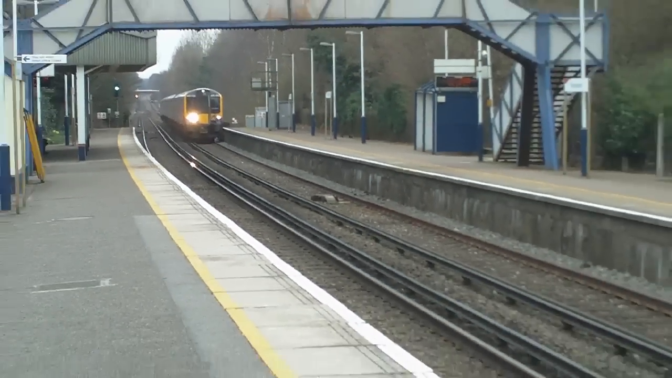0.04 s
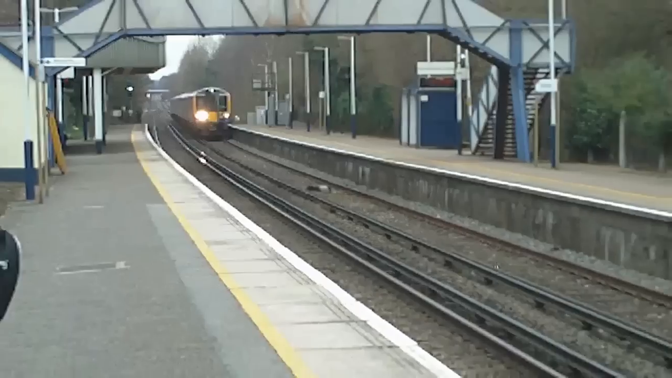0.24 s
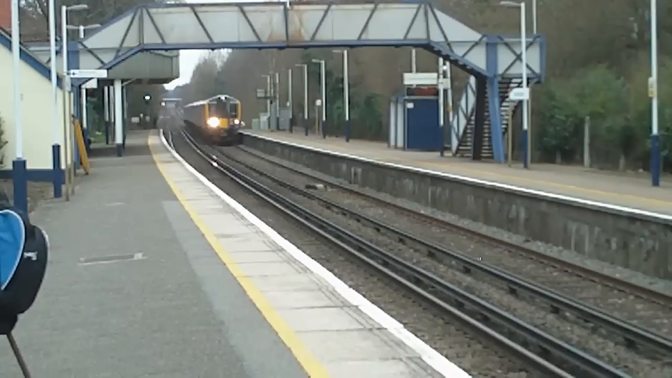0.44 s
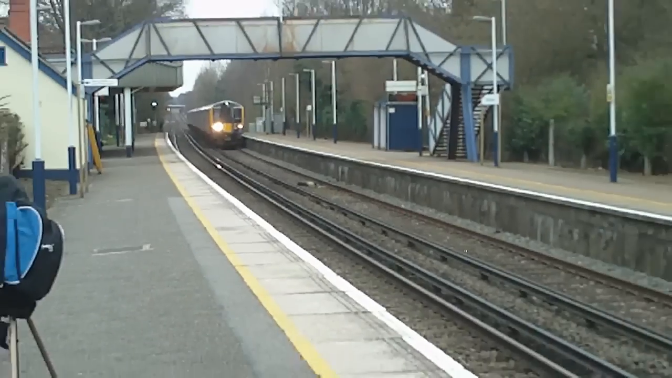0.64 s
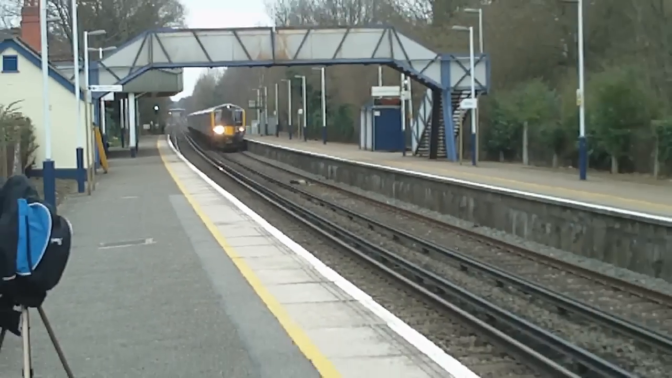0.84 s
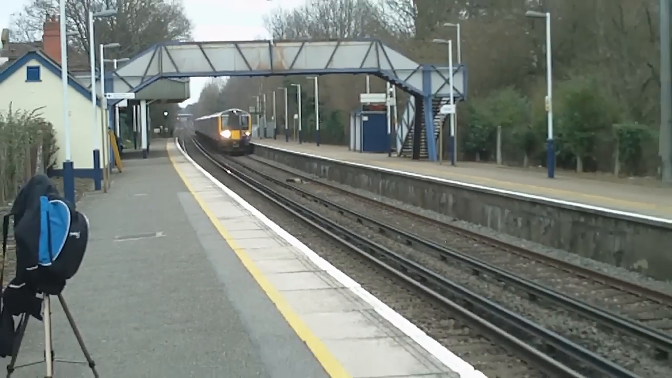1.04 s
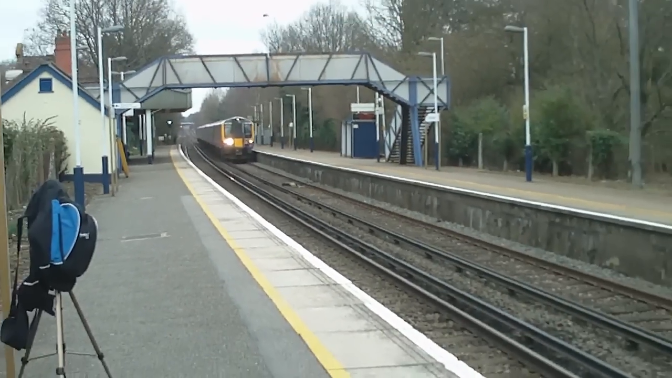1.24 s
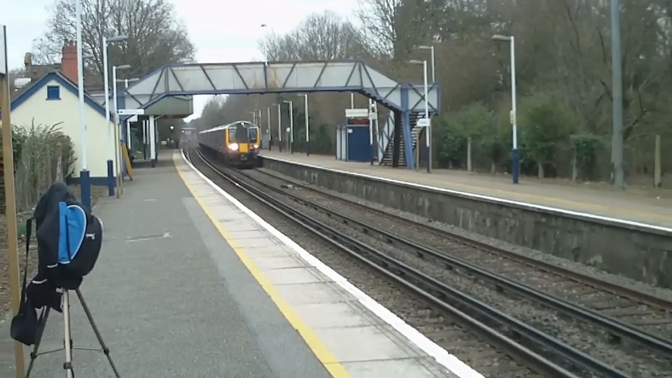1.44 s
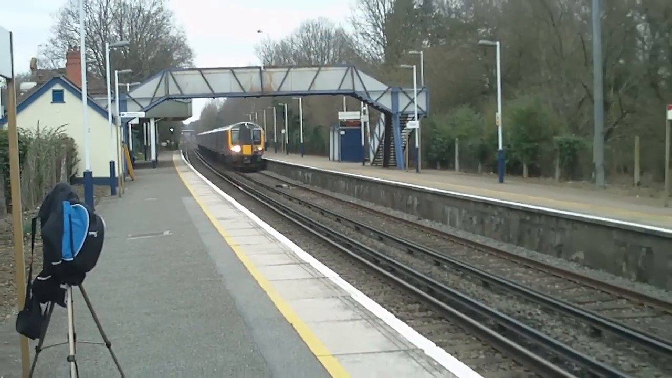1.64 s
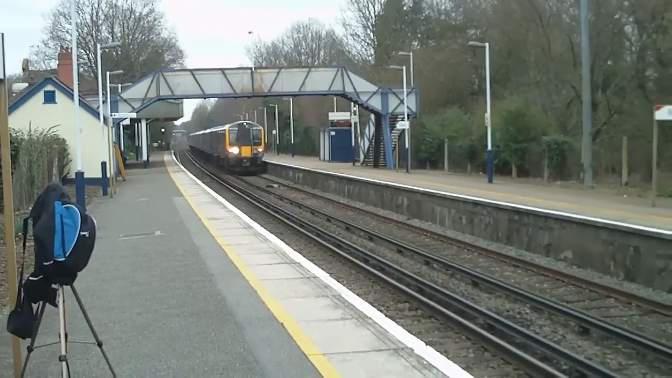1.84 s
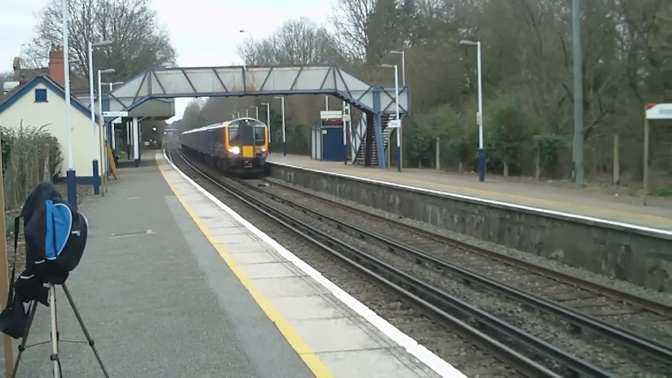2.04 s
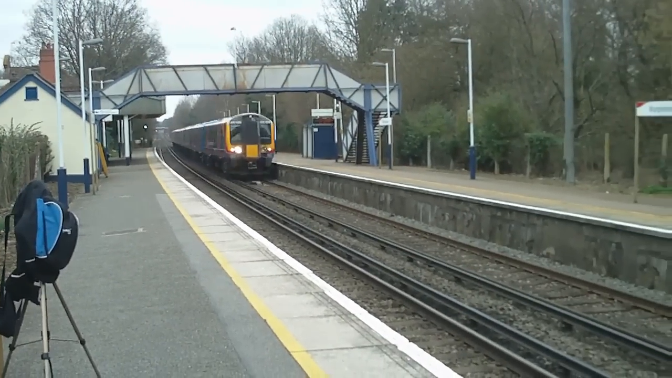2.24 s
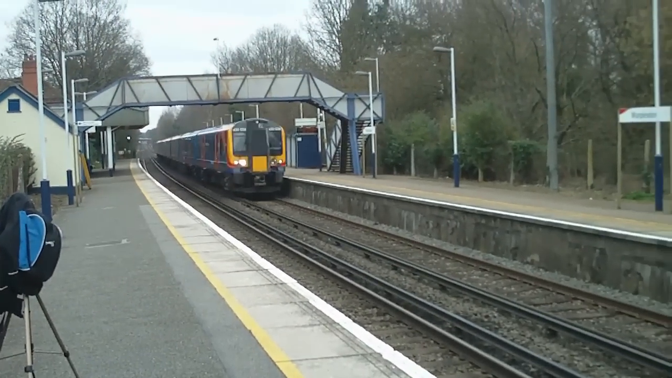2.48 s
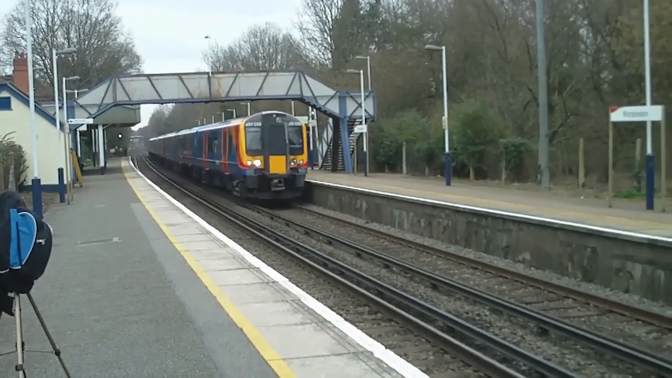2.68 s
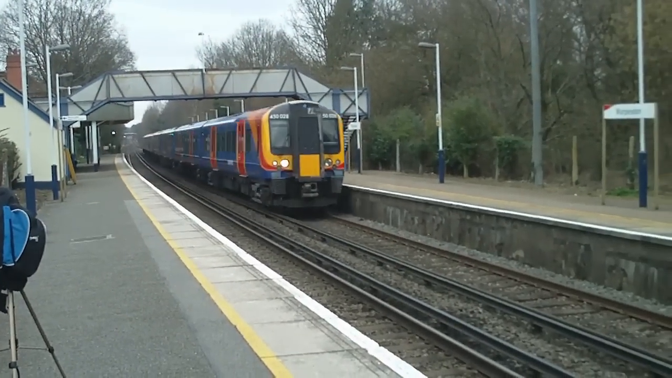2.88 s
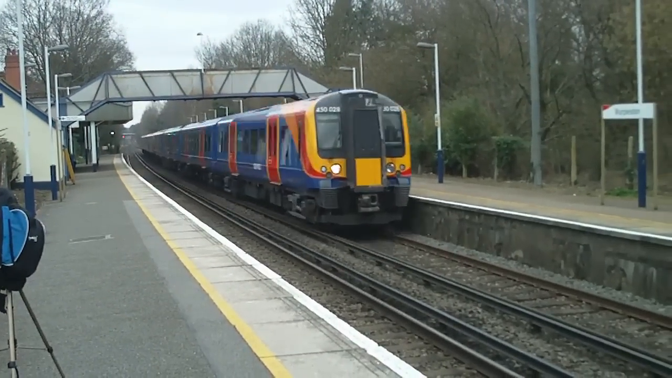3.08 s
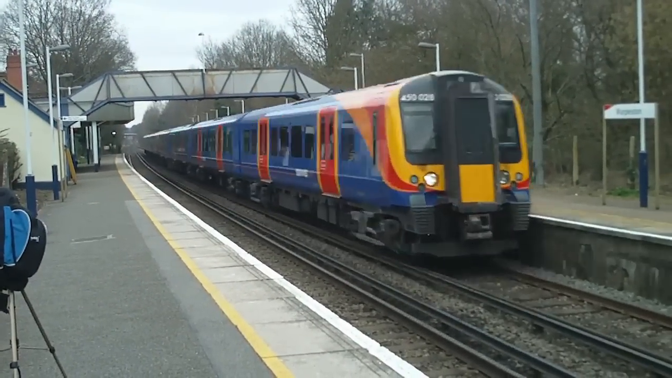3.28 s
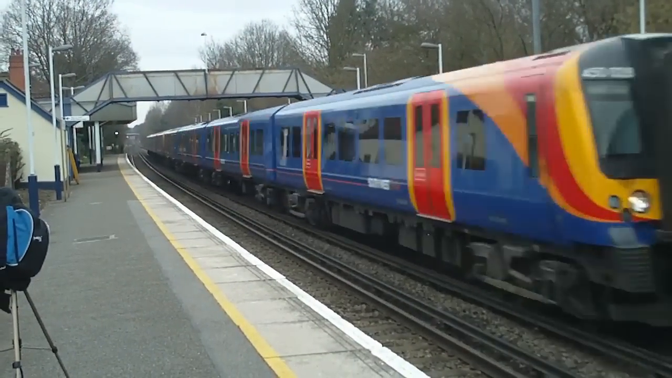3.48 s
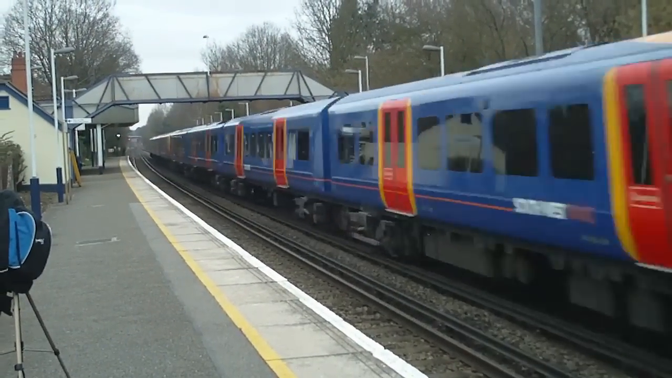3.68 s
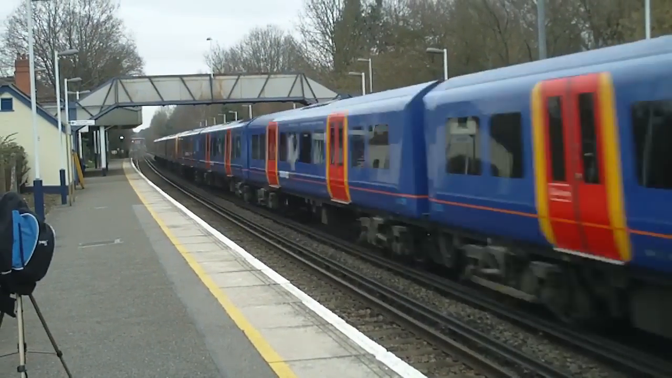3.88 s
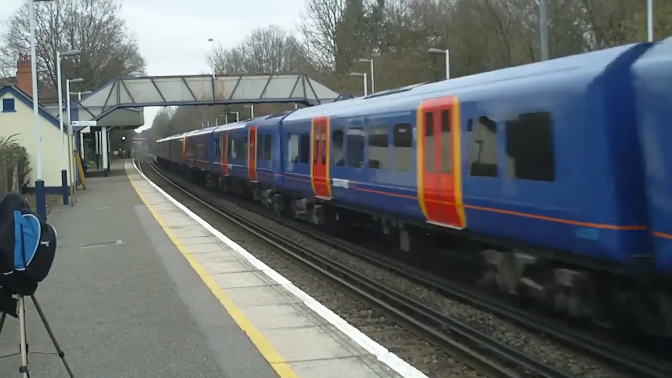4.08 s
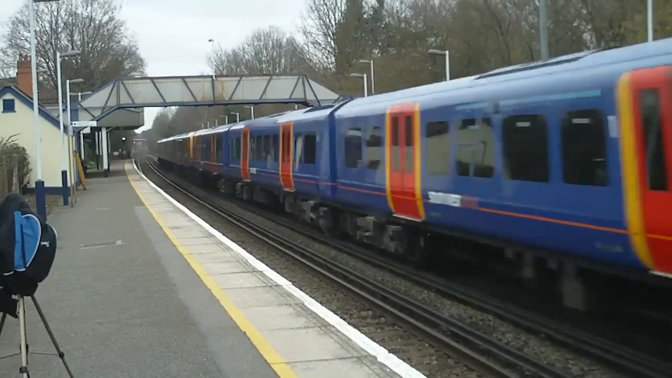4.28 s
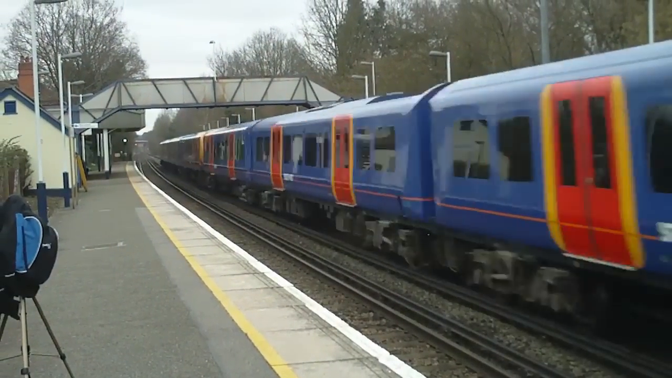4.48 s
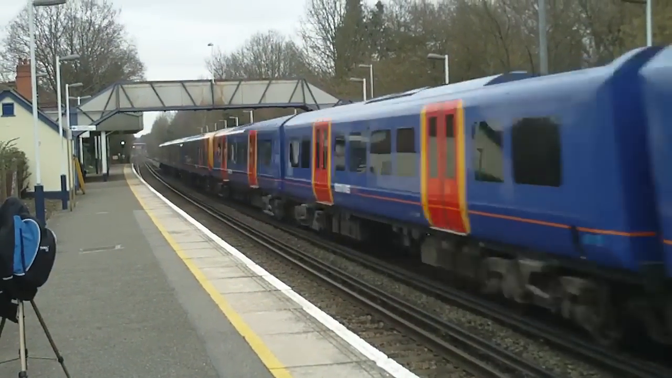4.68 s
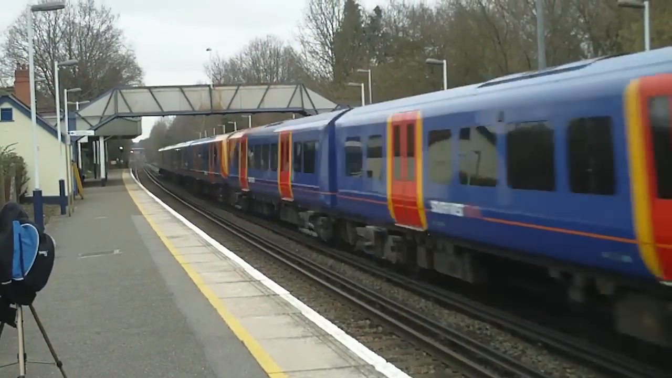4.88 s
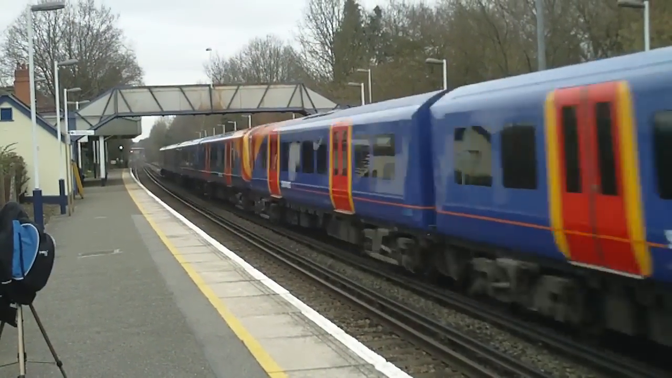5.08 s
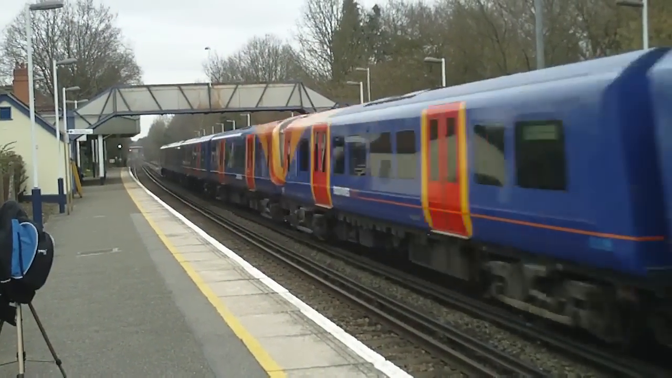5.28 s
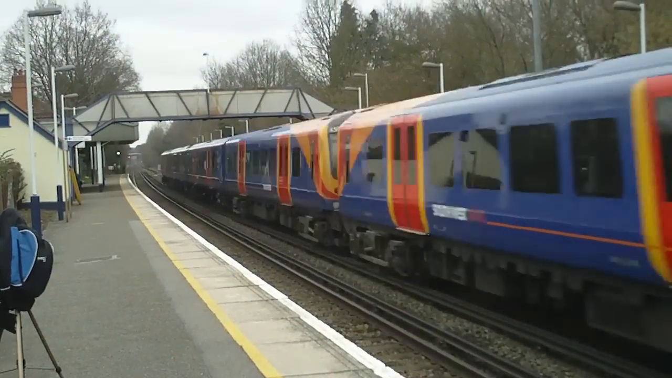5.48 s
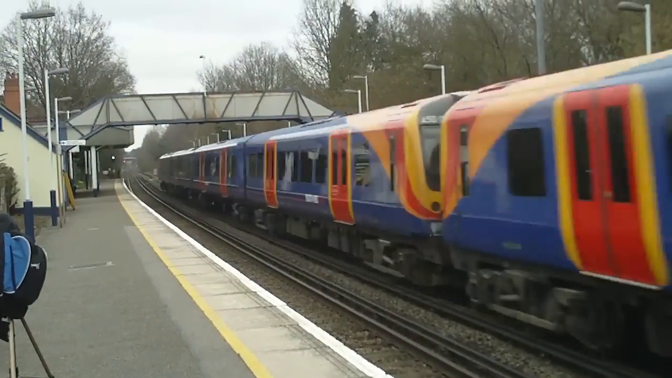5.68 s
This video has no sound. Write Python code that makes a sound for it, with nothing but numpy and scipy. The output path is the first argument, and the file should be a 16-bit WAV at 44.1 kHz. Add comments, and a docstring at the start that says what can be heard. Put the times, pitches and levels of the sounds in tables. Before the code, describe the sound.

An electric passenger train approaches and rushes past a platform, its wheels swelling into a heaving roar after faint squeals and one sharp snap.

```python
"""A station platform: an electric train comes round a bend and runs past at speed.
The steel rails carry high singing and brief wheel squeals ahead of it, with light ticks and one sharp
snap made of quick slips. Rough wheels on rough rail swell into a roar that heaves as each pair of
bogies goes by. Resonances of wheel and rail flare out of it, and the cars hum low underneath."""
import sys
import numpy as np
from scipy import signal
from scipy.fft import rfft, irfft, next_fast_len
from scipy.io import wavfile

SR = 44100
rng = np.random.default_rng(int(sys.argv[2]) if len(sys.argv) > 2 else 0)


def wrap_up_sound(samples):
    """Save the sound to the file named by the first command line argument, as 16-bit audio."""
    columns = np.atleast_2d(samples).T
    # keep every value between -1 and 1, then stretch to whole-number steps
    tamed = np.clip(columns, -1, 1)
    steps = np.round(tamed * 32767).astype(np.int16)
    wavfile.write(sys.argv[1], SR, steps)


N = 252252
TIME = np.arange(N) / SR
FREQ = np.maximum(np.arange(N // 2 + 1) * SR / N, 1)

# The build of the rolling noise. Each row: time in seconds, roar in dB, contact hiss in dB before trim.
ROLLING_LEVELS = [(0.0, -50, -73), (0.5, -49, -72), (1.15, -47.5, -66.5), (1.4, -45, -67.0),
                  (2.1, -43.5, -61), (2.4, -40, -58), (2.95, -35.8, -50), (3.2, -32, -48.0),
                  (3.42, -29, -41.5), (3.68, -22, -37.5), (4.0, -22.5, -37.5), (4.5, -21, -35.5),
                  (4.88, -21, -35), (5.28, -22.5, -36), (5.72, -19, -34)]


def rolling_wheels(crossovers_hz=(450, 1800, 3800), flutters_db=(.5, .7, .64, .5), flutter_hz=14):
    """Rough wheels on rough rail: four bands of noise whose colour shifts as the train draws near."""
    # Where the front of the train is. Each row: time in seconds, stage from 0 (far) to 3 (alongside).
    approach = [(0, 0.17), (2.3, 0.63), (2.8, 1.24), (3.35, 1.7), (3.8, 2.76), (3.95, 2.8)]
    # The colour at each of the four stages. Each row: frequency in Hz, relative level in dB.
    far = [(30, -50), (100, -23.5), (200, -19), (300, -10), (420, -11.5), (580, -3), (800, -1),
           (1050, -8.5), (1800, -10.5), (2150, -18), (2900, -15.5), (3600, -26), (6000, -29), (8500, -37),
           (15500, -35)]
    entering = [(30, -42), (100, -22), (170, -12), (290, -7), (410, -16.5), (540, -2.5), (1100, -4.5),
                (1800, -5), (2150, -11), (2700, -8), (3700, -18.5), (5200, -16), (8000, -30.5),
                (15500, -34)]
    drawing_level = [(30, -37), (100, -23), (190, -10.5), (290, -8.5), (400, -11.5), (600, 2.5),
                     (1500, -4.5), (2000, -9.5), (2600, -7), (3750, -21), (5100, -13), (6300, -22),
                     (10000, -29), (15500, -47)]
    alongside = [(30, -45), (110, -30), (230, -17.5), (310, -8.5), (460, -7.5), (680, -2.5), (1400, -1),
                 (2100, -7.5), (3050, -15), (3700, -21), (5600, -18.5), (7700, -30), (11300, -35.5),
                 (12500, -42.5), (15500, -45)]
    # Rail resonances driven by the wheels. Each row: pitch in Hz, width in Hz, lift in dB at each stage.
    rail_modes = [(1422, 112, 1, 10, 9, 0.5), (1910, 66, 8, 7.5, 6, 2), (3180, 110, 4.5, -5, 4.5, 2.5)]
    colours = []
    for k, points in enumerate([far, entering, drawing_level, alongside]):
        peaks_db = sum(db[k] * resonance(hz, width) for hz, width, *db in rail_modes)
        colours.append(from_db(over_hz(points) + peaks_db))
    stage, = in_time(approach)
    crossfades = [np.interp(stage, np.arange(4), row) for row in np.eye(4)]
    lowpasses = [0] + [1 / (1 + (FREQ / hz) ** 12) for hz in crossovers_hz] + [1]
    levels_db = rolling_band_levels(alongside_share=crossfades[-1])
    out = 0
    for low, high, level_db, flutter_db in zip(lowpasses, lowpasses[1:], levels_db, flutters_db):
        band = stereo_noise() * np.sqrt(np.maximum(high - low, 0))
        noise = sum(fade * sound_of(band * colour) for fade, colour in zip(crossfades, colours))
        out = out + noise * from_db(level_db + flutter_db * drift(flutter_hz))
    return out


def rolling_band_levels(alongside_share, between_bogies_db=-2.5, hiss_trim_db=.7):
    """Levels in dB of body rumble, roar, wheel ring and hiss; passing bogies make the rumble heave."""
    roar_db, hiss_db = in_time(ROLLING_LEVELS)
    # Bogies going by. Each row: time in seconds, rumble lift in dB.
    bogies = [(3.89, 7), (4.36, 6), (5.08, 6.2), (5.64, 4.5)]
    # Dull thuds from the distant train. Each row: time in seconds, rumble lift in dB.
    thuds = [(.67, 0.5), (1.85, 9.5)]
    bogies_db = between_bogies_db * alongside_share + sum(db * swell(s, spread_s=.12) for s, db in bogies)
    thuds_db = sum(db * strike(s, rise_s=.033, decay_s=.31) for s, db in thuds)
    rumble_db = roar_db - 15 + bogies_db + thuds_db
    leading_car_db = -3 * swell(3.5, spread_s=.55)  # the ring dips as the leading car goes by
    ring_db = roar_db + .26 * (hiss_db - roar_db) - 2.5 + leading_car_db
    return rumble_db, roar_db, ring_db, hiss_db + hiss_trim_db


def steel_flares():
    """Single resonances of wheel and rail swell out of the rolling noise and sink back."""
    # Each row: peak time in seconds, spread in seconds, pitch in Hz, width in Hz, level in dB.
    flares = [(.46, 0.042, 1780, 200, -51), (2.18, 0.023, 1460, 110, -44), (2.34, .035, 1470, 120, -40),
              (2.72, .15, 1440, 70, -43.5), (3.43, .07, 5150, 220, -44), (3.66, 0.037, 1430, 90, -26),
              (4.06, 0.027, 1500, 100, -26)]
    noise = stereo_noise()
    return sum(from_db(db) * swell(s, spread_s) * sound_of(noise * resonance(hz, width_hz))
               for s, spread_s, hz, width_hz, db in flares)


def rail_snap(travel_at_1khz_s=.00282, ring_hz=6100, ring_t60=.031, ring_db=-29):
    """A few quick slips; bending waves carry highs faster than lows, so the snap chirps down."""
    # The slips. Each row: time in seconds, relative strength in dB.
    slips = [(2.4348, 2), (2.4369, 14), (2.4382, 13), (2.4396, 5)]
    # The tone of the snap. Each row: frequency in Hz, relative level in dB.
    snap_colour = [(100, -45), (430, -5), (750, -16), (1000, -3.5), (1600, -15), (2300, -7.5), (3100, 0),
                   (4500, -9), (6300, -9), (8000, -25.5), (12000, -25.5), (16000, -39)]
    impulses = sum(from_db(db) * np.exp(-2j * np.pi * FREQ * s) for s, db in slips)
    dispersion = np.exp(-4j * np.pi * travel_at_1khz_s * np.sqrt(1000 * FREQ))
    colour = from_db(over_hz(snap_colour))
    snap = irfft(impulses * dispersion * colour / rms(colour), N) * from_db(-2)
    age = np.maximum(TIME - slips[-1][0], 0)
    ring = np.sin(2 * np.pi * ring_hz * age) * np.exp(-np.log(1000) * age / ring_t60)
    return snap + from_db(ring_db) * ring


def singing_rails(shimmer_db=1.5, shimmer_hz=12, trim_db=-3.5):
    """Narrow high resonances carry far ahead along the steel, each with its own shimmer."""
    # The resonances. Each row: pitch in Hz, width in Hz, relative level in dB.
    high_modes = [(6680, 37, -1.5), (6930, 74, 3), (7200, 70, -10), (6640, 600, -10.5), (11540, 190, -9.5),
                  (14050, 250, -8)]
    # Their shared fader. Each row: time in seconds, level in dB before trim.
    fader = [(0, -78), (.44, -75.5), (.5, -68), (.78, -72.5), (1.55, -66.5), (2.0, -70.5), (2.9, -63),
             (4.0, -66)]
    level_db, = in_time(fader)
    noise = stereo_noise()
    singing = sum(from_db(db + shimmer_db * drift(shimmer_hz)) * sound_of(noise * resonance(hz, width))
                  for hz, width, db in high_modes)
    return singing * from_db(level_db + trim_db)


def wheel_squeals(sag_hz_per_s=530, waver_depth_hz=18):
    """Distant wheels squeal through the rails: unsteady tones that swell, sag in pitch and die."""
    # Each row: peak time in seconds, length in seconds, pitch in Hz, level in dB.
    squeals = [(0.082, 0.24, 4170, -67.5), (.09, .18, 5000, -77), (.28, 0.072, 3030, -66),
               (0.891, .06, 1920, -55), (1.207, .06, 3050, -60), (1.38, .07, 1940, -51),
               (1.432, .06, 3020, -57), (1.515, 0.084, 2970, -54)]
    out = np.zeros(N)
    waver_hz = waver_depth_hz * drift(rate_hz=60)
    for s, length_s, hz, db in squeals:
        during = np.abs(TIME - s) < length_s / 2
        from_peak_s = TIME[during] - s
        pitch = hz - sag_hz_per_s * from_peak_s + waver_hz[during]
        envelope = from_db(db) * np.sqrt(2) * np.cos(np.pi * from_peak_s / length_s)
        out[during] += envelope * np.sin(2 * np.pi * np.cumsum(pitch) / SR)
    return out


def light_ticks(t60=.03):
    """Small bright ticks ahead of the train, each a fast-dying burst of noise."""
    # Each row: time in seconds, level in dB.
    ticks = [(.648, -65), (.703, -58), (.722, -60), (2.416, -44)]
    envelope = sum(from_db(db) * strike(s, rise_s=.002, decay_s=t60 / np.log(1000)) for s, db in ticks)
    return envelope * sound_of(stereo_noise() * resonance(hz=5400, width_hz=2500))


def car_hum(offset_db=-54, follows_roar=.74):
    """The low wavering hum of the cars grows with the roar."""
    roar_db, _ = in_time(ROLLING_LEVELS)
    hum = sound_of(stereo_noise() * resonance(hz=54.5, width_hz=7))
    return from_db(offset_db + follows_roar * roar_db) * hum


def stereo_noise():
    """Left and right spectra of white noise, widest in the treble and the deep bass."""
    # Each row: frequency in Hz, left-right correlation from 0 to 1.
    likeness = [(30, 0.72), (80, 1), (200, 1), (1200, 1), (2800, 0.97), (5600, 0.91), (10000, 0.86),
                (15000, .65)]
    mid, side = rfft(rng.standard_normal((2, N)))
    alike = np.clip(over_hz(likeness), 0, 1)
    return np.sqrt(1 + alike) * mid + np.sqrt(1 - alike) * side * [[1], [-1]]


def from_db(db):
    """Decibels to gain."""
    return 10 ** (np.asarray(db) / 20)


def rms(x):
    """Root mean square."""
    return np.sqrt(np.mean(x ** 2) + 1e-20)


def in_time(rows):
    """Each column of a curve at every sample."""
    s, *columns = np.transpose(rows)
    return [np.interp(TIME, s, c) for c in columns]


def over_hz(points):
    """A breakpoint curve at every frequency."""
    hz, value = np.transpose(points)
    return np.interp(np.log(FREQ), np.log(hz), value)


def resonance(hz, width_hz):
    """Gain of a resonance, 1 at its peak."""
    return 1 / (1 + ((FREQ - hz) / (width_hz * .75)) ** 2)


def drift(rate_hz):
    """A random wander of rms 1, mostly slower than the given rate."""
    slow = irfft(rfft(rng.standard_normal(N)) / (1 + (FREQ / rate_hz) ** 2) * (FREQ > 1), N)
    return slow / rms(slow)


def sound_of(spectrum):
    """A spectrum as sound of rms 1."""
    x = irfft(spectrum, N)
    return x / rms(x)


def swell(middle_s, spread_s):
    """A bell-shaped swell of height 1."""
    return np.exp(-.5 * ((TIME - middle_s) / spread_s) ** 2)


def strike(s, rise_s, decay_s):
    """A quick rise to 1 and an exponential decay."""
    return np.clip(1 + (TIME - s) / rise_s, 0, 1) * np.exp(-np.maximum(TIME - s, 0) / decay_s)


def scene():
    """Everything comes from the track and reaches the left side a little later."""
    # Each row: frequency in Hz, delay of the left side in seconds.
    left_lag = [(600, 0.0000069), (1300, 0.0000069), (3700, 0.000018), (11500, 2.1e-5)]
    left, right = (rolling_wheels() + singing_rails() + steel_flares() + car_hum()
                   + wheel_squeals() + light_ticks() + rail_snap())
    size = next_fast_len(N + SR)
    hz = np.fft.rfftfreq(size, 1 / SR)
    lag_s = np.interp(hz, FREQ, over_hz(left_lag))
    late_left = irfft(rfft(left, size) * np.exp(-2j * np.pi * hz * lag_s), size)[:N]
    return np.array([late_left, right])


def record(dry, ceiling=.95, cutoff_hz=15750):
    """A soft clip rounds the loudest peaks and a steep low-pass cuts the top."""
    rounded = dry / (1 + (dry / ceiling) ** 6) ** (1 / 6)
    return signal.sosfilt(signal.ellip(12, .1, 80, cutoff_hz, fs=SR, output="sos"), rounded)


dry = scene()
out = record(dry)
wrap_up_sound(out)
```